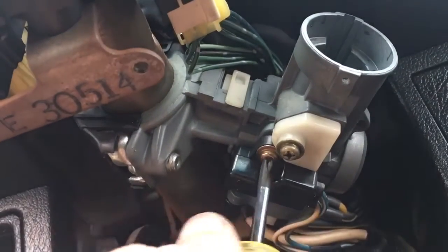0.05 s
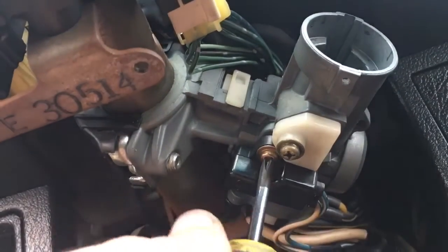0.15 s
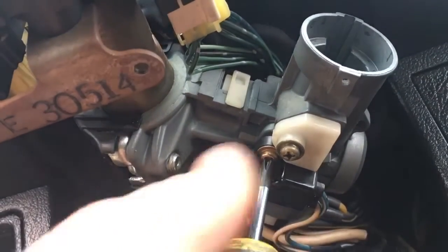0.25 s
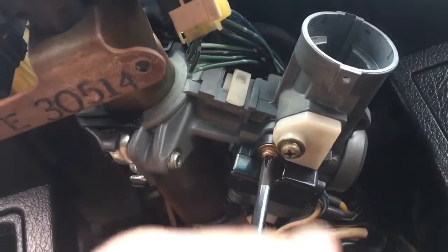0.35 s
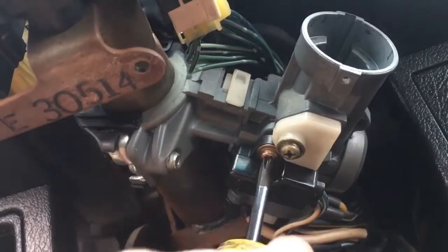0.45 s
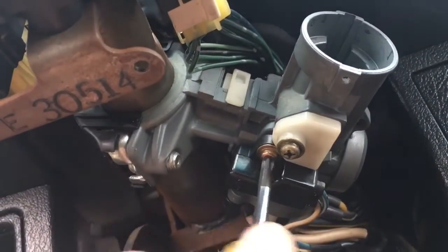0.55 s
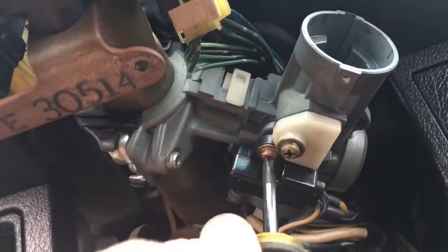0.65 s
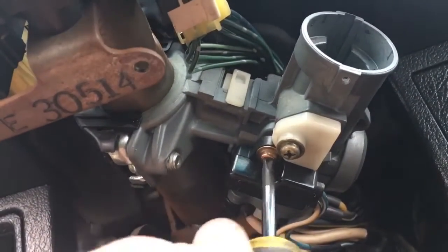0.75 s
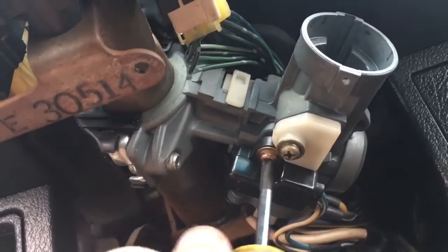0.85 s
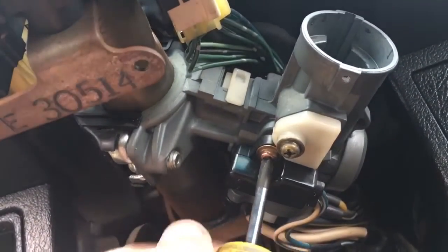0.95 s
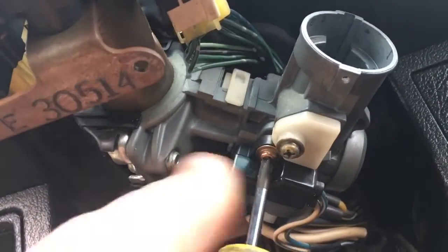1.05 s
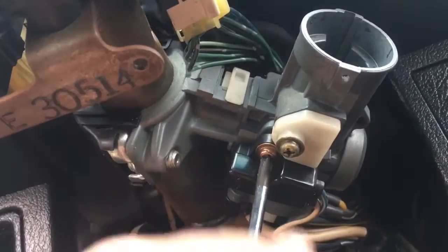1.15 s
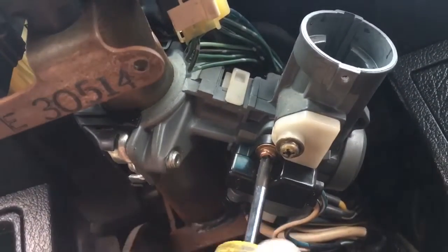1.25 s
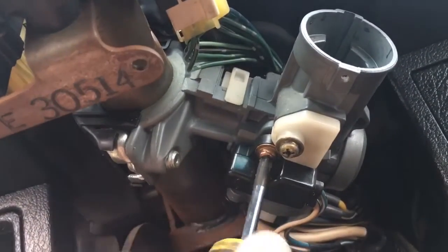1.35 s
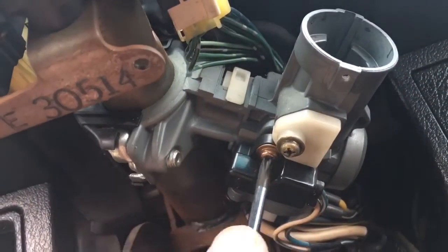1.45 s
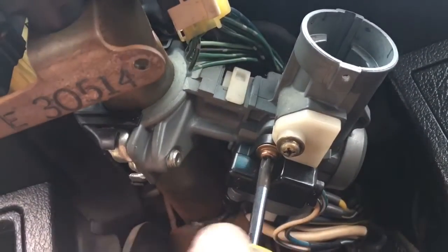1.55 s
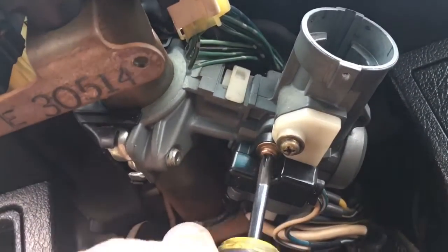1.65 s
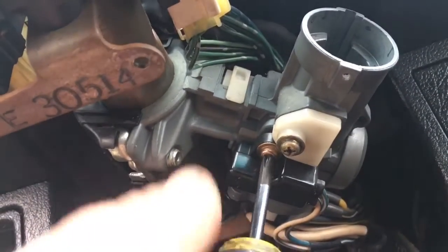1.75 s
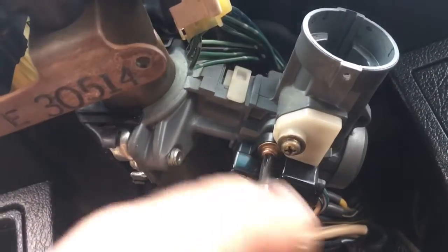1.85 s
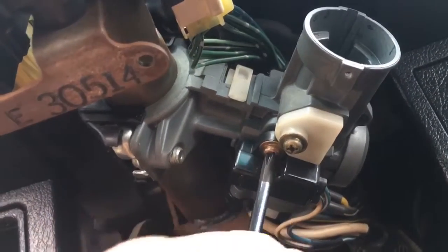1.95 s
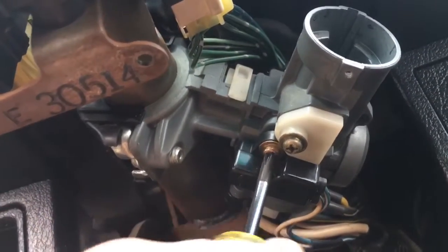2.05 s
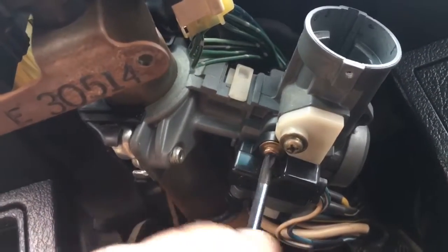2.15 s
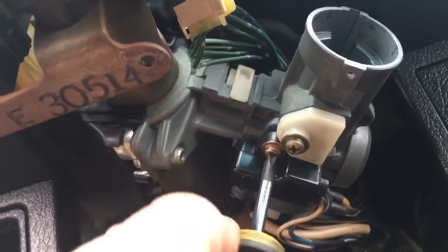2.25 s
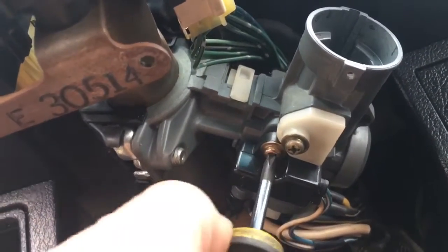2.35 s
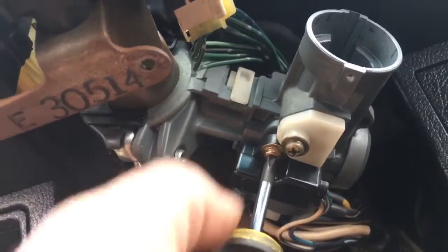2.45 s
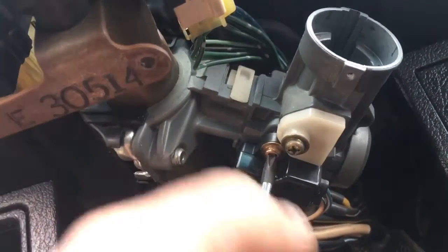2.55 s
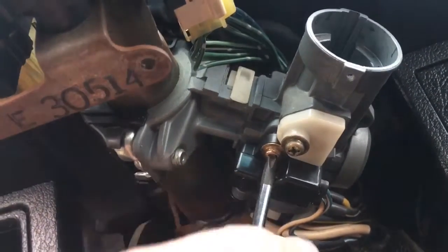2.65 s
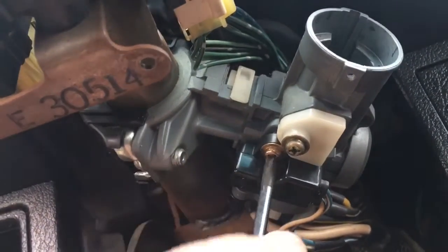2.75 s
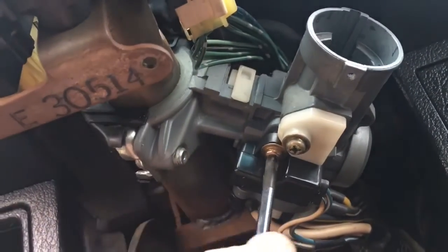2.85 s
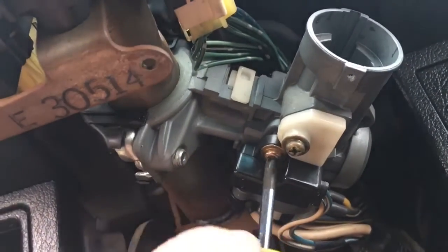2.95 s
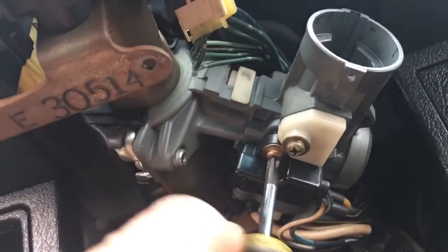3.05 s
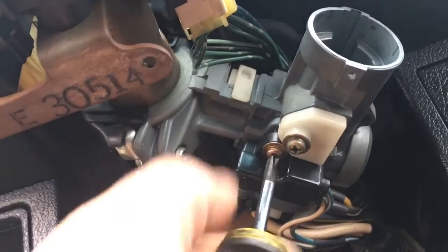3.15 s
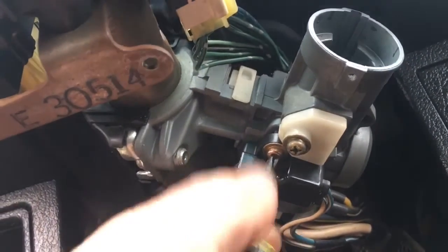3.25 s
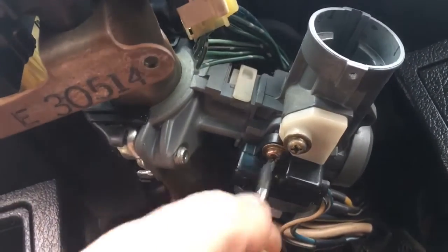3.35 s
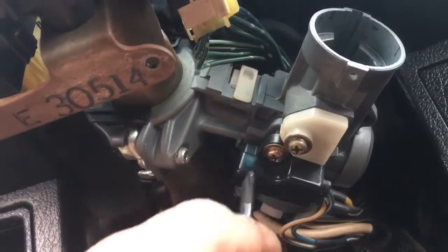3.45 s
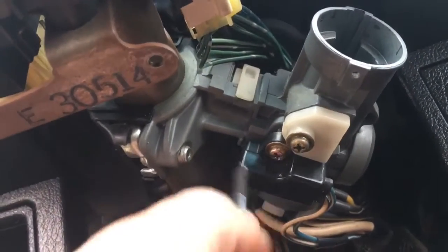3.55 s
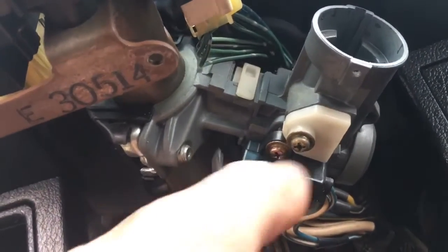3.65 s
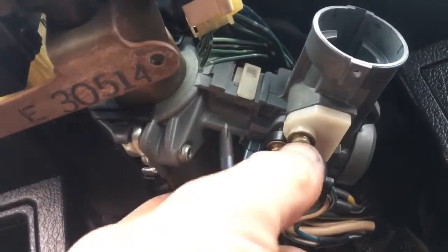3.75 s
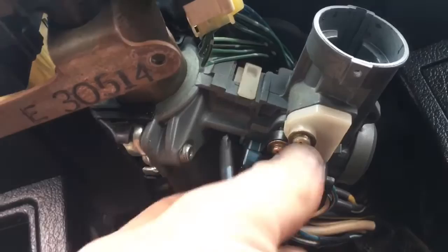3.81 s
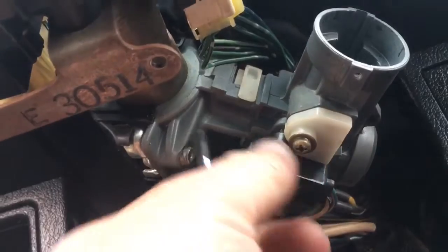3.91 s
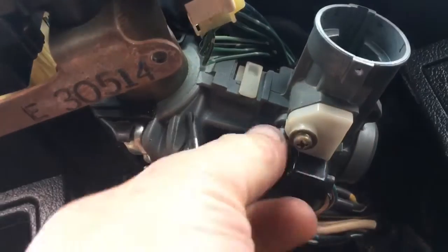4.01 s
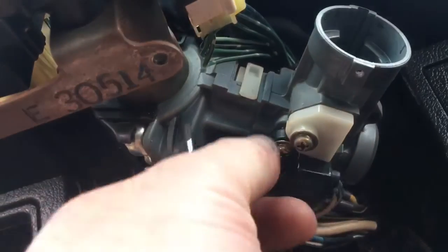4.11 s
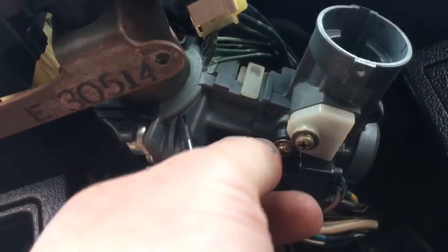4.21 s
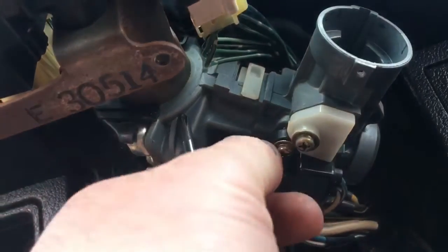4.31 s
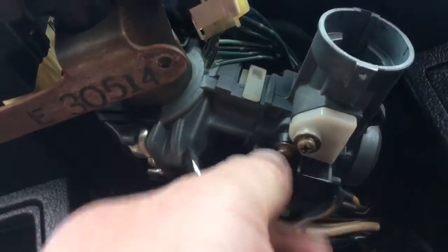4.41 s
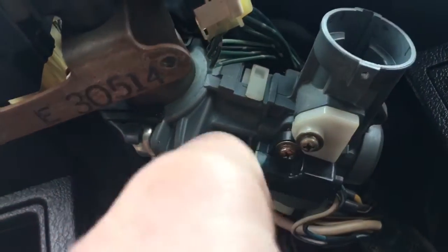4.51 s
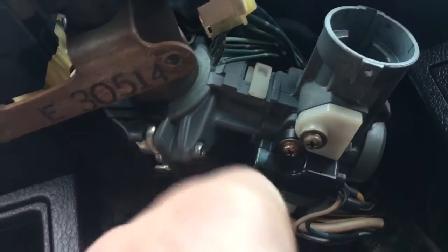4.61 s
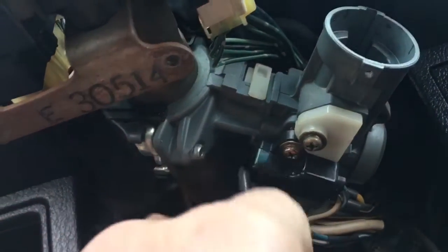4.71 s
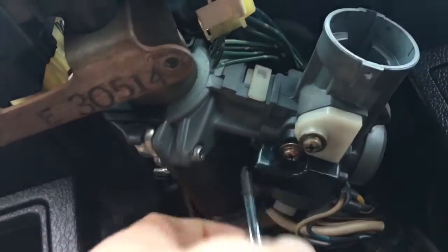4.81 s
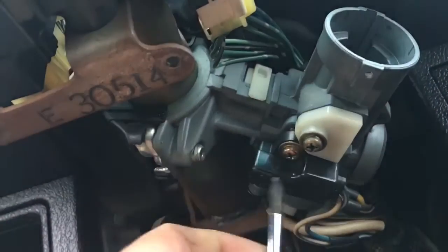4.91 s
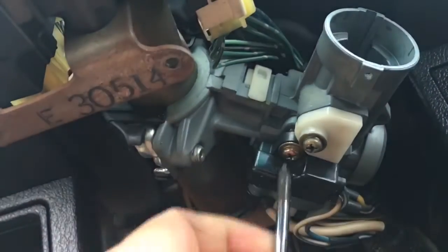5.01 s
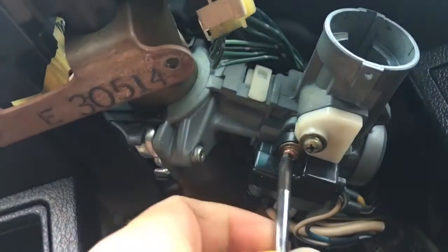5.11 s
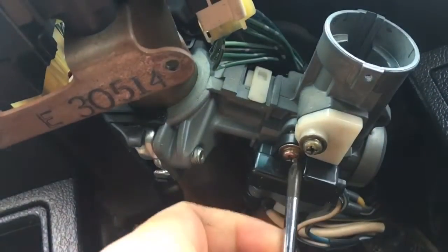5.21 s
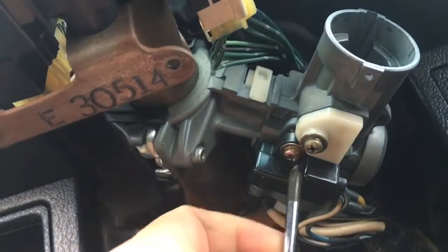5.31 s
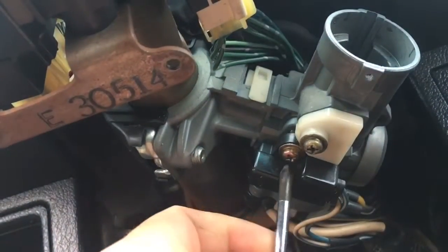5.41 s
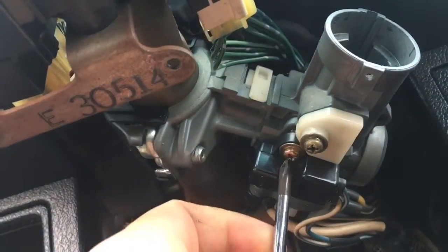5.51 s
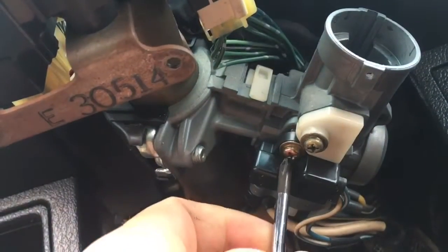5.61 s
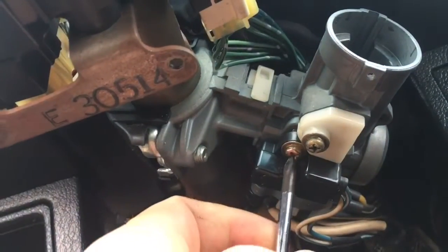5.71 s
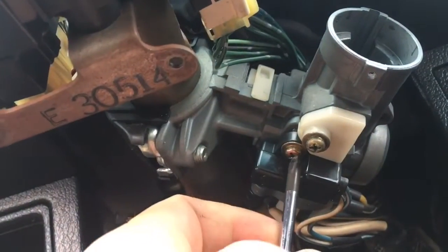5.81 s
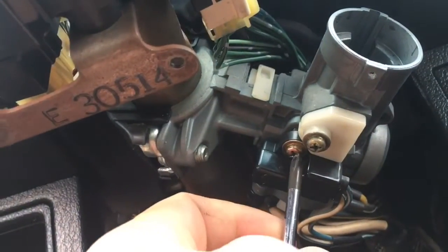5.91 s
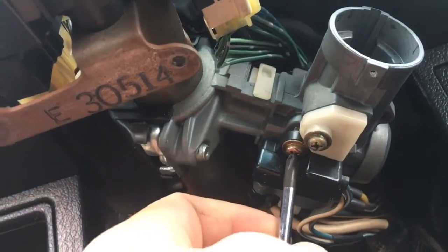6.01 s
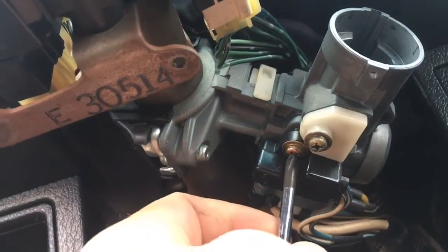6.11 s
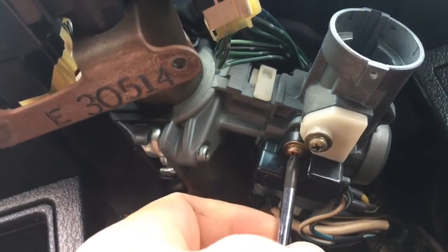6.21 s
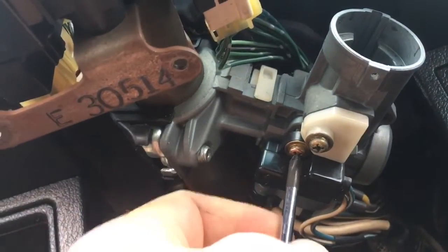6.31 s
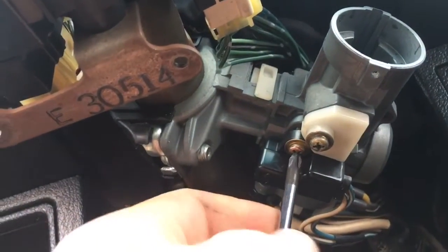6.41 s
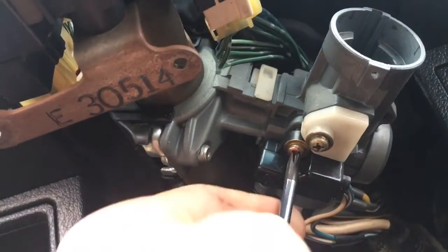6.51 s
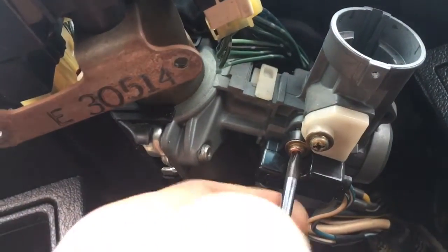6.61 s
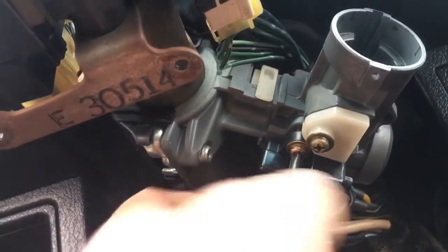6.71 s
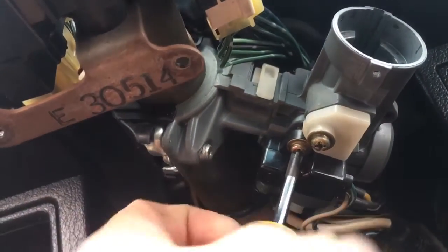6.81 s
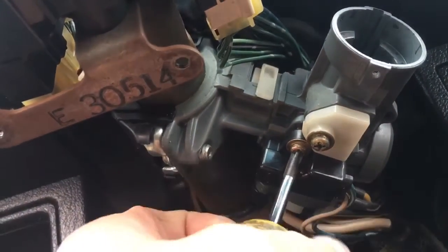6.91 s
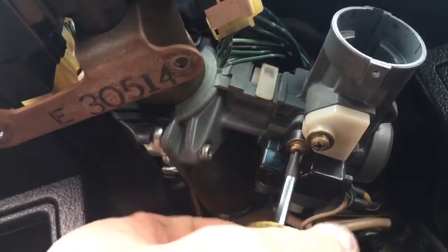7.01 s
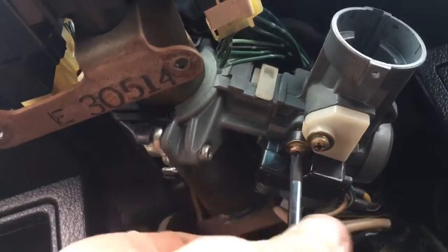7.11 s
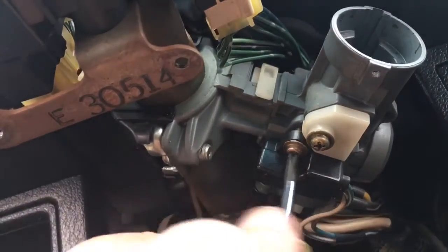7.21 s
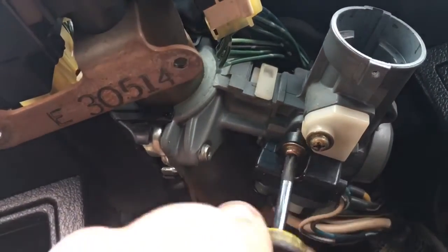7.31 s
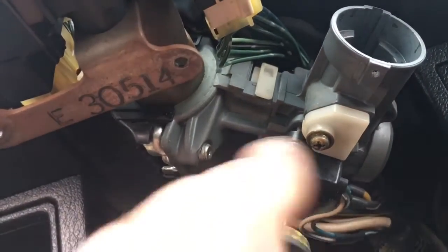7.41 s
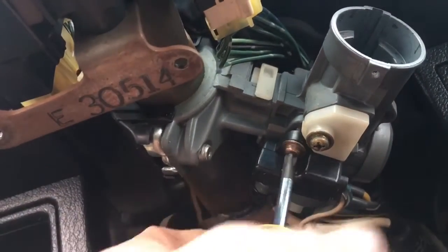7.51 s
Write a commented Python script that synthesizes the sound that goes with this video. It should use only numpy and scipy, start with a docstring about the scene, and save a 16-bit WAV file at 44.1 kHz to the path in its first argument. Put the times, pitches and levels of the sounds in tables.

```python
"""A screwdriver backs a small screw out of a metal housing under a car's dashboard, close to the microphone.
At first fingers rub the handle in long passes over a soft cabin rumble, with faint ticks and a grinding thread.
Soft hand bumps follow, then the loudest ticks and knocks near the middle, as impacts ring damped modes.
Later come quieter ticks, knocks and short scrapes of filtered friction noise, while a low throbbing hum grows."""
import sys
import numpy as np
from scipy import signal
from scipy.fft import rfft, irfft, next_fast_len
from scipy.io import wavfile
from scipy.ndimage import uniform_filter1d, map_coordinates

SR = 44100
rng = np.random.default_rng(int(sys.argv[2]) if len(sys.argv) > 2 else 0)


def generate_wav(sig):
    """Save sig (samples, or channels by samples) to the path in sys.argv[1] as 16-bit PCM at SR."""
    pcm = np.round(np.clip(np.atleast_2d(sig).T, -1, 1) * 32767).astype(np.int16)
    wavfile.write(sys.argv[1], SR, pcm)


N = 333396

# resonances of screwdriver and screw, before each blow's random shift: pitch_hz, level_db, t60_s
STEEL_MODES = [(2150, -33, .04), (2760, -19.5, 0.017), (2710, -18, 0.015), (3115, 2, 0.023),
               (3196, -2, 0.032), (3480, -5, 0.031), (3430, 0.5, 0.018), (3670, 17, 0.0056),
               (3970, 6.5, 0.018), (4160, 2, 0.016), (4520, -2, 0.027), (6470, -1, 0.017),
               (6450, -19, 0.026), (6840, -4, 0.029), (9050, -28, .012), (11600, -27, 0.034)]


def amp(db):
    """Decibel law: level to amplitude gain."""
    return 10 ** (np.asarray(db) / 20)


def unit(x):
    """Power normalization: scale to rms 1."""
    return x / np.sqrt(np.mean(x ** 2) + 1e-20)


def curve(rows):
    """Linear interpolation of (s, value) rows, one value per sample."""
    return np.interp(np.arange(N) / SR, *np.transpose(rows))


def wobble(rate):
    """Band-limited fluctuation: a spline through random knots, rate knots a second."""
    knots = rng.standard_normal(int(N * rate / SR) + 4)
    return map_coordinates(knots, [np.arange(N) * rate / SR])


def colour(x, points):
    """Linear filtering: x shaped by a (Hz, dB) spectrum, at rms 1."""
    size = next_fast_len(len(x) + 8192)
    hz, db = np.transpose(points)
    log_hz = np.log(np.fft.rfftfreq(size, 1 / SR) + 1)  # the 1 avoids log(0)
    gain = amp(np.interp(log_hz, np.log(hz), db))
    return unit(irfft(rfft(x, size) * gain, size)[:len(x)])


def noise(points, size=N):
    """Spectral shaping of white noise, at rms 1."""
    return colour(rng.standard_normal(size), points)


def patchy(x, depth_db):
    """Time-varying filtering: a smooth random gain over time and frequency shifts the colour."""
    bins = signal.stft(x, nperseg=512)[2]
    field = uniform_filter1d(rng.standard_normal(bins.shape), size=6, axis=0)  # across frequency
    field = uniform_filter1d(field, size=7, axis=1)  # across time
    return unit(signal.istft(bins * amp(depth_db * unit(field)), nperseg=512)[1][:N])


def add(track, s, sound):
    """Superposition: mix a sound in at s seconds."""
    part = track[max(round(s * SR), 0):][:len(sound)]
    part += sound[:len(part)]


def swell(size, rise):
    """Stroke envelope: power rises over the share rise of its length, then falls linearly."""
    peak = np.clip(rise, .02, .9)
    return np.sqrt(np.interp(np.linspace(0, 1, size), [0, peak, 1], [0, 1, 0]))


def swells(rows, rise):
    """Amplitude modulation: the gain of a series of strokes."""
    track = np.zeros(N)
    for s, length, db in rows:
        add(track, s, amp(db) * swell(int(length * SR), rise))
    return track


def grit(rate, grain_db):
    """Stick-slip friction: random micro-slips of uneven size, on average rate a second."""
    slips = rng.random(N) < rate / SR
    sizes = rng.standard_normal(N) * amp(grain_db * rng.standard_normal(N))
    return unit(slips * sizes)


def ring(modes, t):
    """Modal superposition: damped sines; the grip shifts their strength and pitch from blow to blow."""
    hz, db, t60 = np.transpose(modes)[:, :, None]
    size_db = 3.5 * rng.standard_normal((len(modes), 1))
    shift = .012 * rng.standard_normal((len(modes), 1))  # as a share of the pitch
    return np.sum(amp(db + size_db - 60 * t / t60) * np.sin(2 * np.pi * hz * (1 + shift) * t), axis=0)


def reflected(x, db, t60):
    """Diffuse reflection: nearby panels scatter a short dense tail back."""
    tail = rng.standard_normal(len(x)) * amp(-60 * np.arange(len(x)) / SR / t60)
    tail = tail / np.linalg.norm(tail)
    return x + amp(db) * signal.fftconvolve(x, tail)[:len(x)]


def favour(x, spot_hz, db):
    """Selective excitation: lift the band that a contact drives best."""
    band = signal.butter(2, [spot_hz / 1.22, spot_hz * 1.22], 'band', fs=SR, output='sos')
    return x + amp(db) * signal.sosfilt(band, x)


def cabin_rumble():
    """Broadband noise: a low cabin spectrum whose level drifts slowly."""
    # rumble spectrum: pitch_hz, relative_db
    spectrum = [(20, -31), (43, 2), (65, -3), (97, -5.5), (125, -4.5), (172, -15.5), (290, -22.5),
                (464, -38.5), (559, -35.5), (600, -34), (780, -63), (1320, -120)]
    # slow course of the rumble, ahead of a 7 dB lift: time_s, relative_db
    course = [(0, -56.5), (.4, -58.5), (1.3, -53.5), (3.2, -59.5), (3.7, -57), (5.4, -58.5), (7.56, -57)]
    return noise(spectrum) * amp(curve(course) + 7 + 0.99 * wobble(2.7))


def cabin_hiss():
    """Broadband noise: a faint hiss with a slowly shifting colour."""
    # hiss spectrum: pitch_hz, relative_db
    spectrum = [(240, -8.5), (400, -3), (650, -6), (840, -3), (1200, -5.5), (1520, -9), (2200, -3.5),
                (2800, -4.5), (4000, -8), (6500, -10), (10000, -14), (15800, -21)]
    # rms course of the hiss: time_s, level_db
    course = [(0, -61.5), (4.6, -61.5), (5.1, -64.5), (7.56, -61)]
    return patchy(noise(spectrum), depth_db=3.0) * amp(curve(course) + 0.28 * wobble(30))


def cabin_hum(hum_hz=73.3, waver_hz=0.82):
    """Amplitude and frequency modulation: a low tone wavers in pitch and throbs unevenly."""
    # course of the hum, ahead of a 3.5 dB lift: time_s, relative_db
    course = [(0, -67), (4.4, -58), (5.3, -49), (5.9, -53.5), (6.3, -48), (7.56, -47)]
    phase = 2 * np.pi * np.cumsum(hum_hz + waver_hz * wobble(4.1)) / SR
    throb = 1 + .36 * (wobble(28) + 1j * wobble(28))  # random in strength and phase
    return np.real(throb * np.exp(1j * phase)) * amp(curve(course) + 3.5)


def sliding(attack_s=0.014, fade_db=7, release_s=0.029):
    """Stick-slip friction: skin slides over the handle, each pass biting, losing pressure and letting go."""
    # fingers roll the handle, one pass each, level at its start before flutter: start_s, length_s, level_db
    passes = [(0, 0.49, -50.5), (0.474, 0.45, -51), (0.905, 0.46, -55), (1.399, 0.23, -53),
              (1.601, 0.284, -50.5), (1.863, .3, -58), (2.167, .17, -57.5), (2.707, .13, -58.5),
              (6.199, 0.14, -61)]
    # skin on the handle: pitch_hz, relative_db
    spectrum = [(290, -39), (500, -10), (728, -51), (878, -5), (972, -13), (1280, -4.5), (1520, -11),
                (2560, 2.5), (3220, 3), (4900, -5), (5580, 1), (6450, -4), (8990, -2), (11500, -6),
                (15800, -11.5)]
    pressure = np.zeros(N)
    for s, length, db in passes:
        t = np.arange(int(length * SR)) / SR
        contact = np.clip(np.minimum(t / attack_s, (length - t) / release_s), 0, 1)
        add(pressure, s, contact * amp(db - fade_db * t / length))
    skin = patchy(colour(grit(rate=3500, grain_db=2), spectrum), depth_db=3.3)
    flutter_db = 2.5 * wobble(90) + 2.5 * wobble(24.82)
    return skin * pressure * amp(flutter_db)


def bumps(rise_s=0.0044):
    """Heavily damped impact: flesh meets the handle in one or two dull swings."""
    # soft bumps of the hand, level of the push: start_s, level_db, pitch_hz
    pushes = [(2.605, -32.5, 152), (2.707, -36, 159), (2.735, -34.5, 169), (2.812, -29.5, 96),
              (2.866, -35, 140), (2.896, -36, 126), (3.799, -27.5, 141), (3.993, -35, 132)]
    track, t = np.zeros(N), np.arange(SR // 16) / SR
    push = (t / rise_s * np.exp(1 - t / rise_s)) ** 3  # greatest at rise_s
    for s, db, hz in pushes:
        add(track, s, amp(db) * push * np.sin(2 * np.pi * hz * t))
    return track


def scraping():
    """Friction noise: tip and fingers scrape in short strokes, each with its own brightness."""
    # strokes, treble tilt from 1 to 16 kHz: start_s, length_s, level_db, tilt_db_per_octave
    strokes = [(.004, 0.1, -52, -3.5), (0.179, 0.11, -51, 1), (2.466, 0.026, -50, 8.5),
               (2.915, 0.17, -58.5, 2), (3.153, 0.13, -60, 3.5), (3.41, 0.066, -54.5, 2),
               (3.72, 0.57, -62.5, 0.5), (4.137, 0.064, -47, -3.5), (4.441, 0.046, -46, -4),
               (4.917, 0.056, -42.5, -4.5), (5.886, 0.046, -55.5, -3), (5.963, .2, -60.5, -3.5),
               (6.45, .16, -56.5, -1), (6.635, 0.051, -53, -1), (6.684, .12, -48.5, -2.5),
               (6.877, 0.045, -46, -0.5), (6.965, 0.073, -45.5, -2.5), (7.054, 0.11, -53, -2),
               (7.24, 0.046, -49.5, -3), (7.288, 0.15, -62.5, -1), (7.4, .37, -58.5, 5.5)]
    # scraping friction before the tilt: pitch_hz, relative_db
    spectrum = [(260, -54), (450, -24), (653, -6), (866, -4.5), (1280, -2), (1370, -0.5), (1740, 1.5),
                (1880, 0.5), (2090, 3), (2610, 2.5), (3840, 6.5), (6370, 3.5), (8080, 0.5), (8970, 1),
                (15800, -9.5)]
    rub = patchy(colour(grit(rate=3500, grain_db=2.5), spectrum), depth_db=2)
    rub = rub * amp(2.3 * wobble(130))  # fast flutter in dB
    track = np.zeros(N)
    for s, length, db, tilt_db in strokes:
        piece = rub[round(s * SR):][:int(length * SR)]
        tilt = [(hz, tilt_db * np.log2(hz / 4000)) for hz in (1000, 16000)]
        stroke = colour(piece, tilt)
        add(track, s, amp(db) * stroke * swell(len(stroke), rise=0.15))
    return track


def spinning(spin_hz=5140, spin_q=6.7):
    """Resonance driven by friction: turned by fingertips, the loosened screw rasps in one high mode."""
    # spins: start_s, length_s, level_db
    turns = [(3.76, 0.51, -75), (4.14, 0.053, -48.5), (4.39, 0.074, -52.5), (4.445, 0.013, -42)]
    b, a = signal.iirpeak(spin_hz, spin_q, fs=SR)
    rasp = unit(signal.lfilter(b, a, grit(rate=4000, grain_db=4.5)))
    return rasp * swells(turns, rise=0.56)


def thread_grinding(soft_hz=6000):
    """Convolution of friction with a modal response: the thread grinds into the steel's lower modes."""
    # the thread grinds as it turns: start_s, length_s, level_db
    grinds = [(.19, 0.089, -49), (.49, 0.15, -55.5), (.625, 0.054, -46.5), (2.19, 0.088, -51.5),
              (3.402, 0.03, -51), (4.38, 0.12, -53.5), (4.87, 0.045, -50.5), (4.914, 0.065, -44),
              (6.035, 0.049, -48.5)]
    lowpass = signal.butter(2, soft_hz, fs=SR, output='sos')
    steel = signal.sosfilt(lowpass, ring(STEEL_MODES, np.arange(SR // 16) / SR))
    thread = unit(signal.fftconvolve(grit(rate=2600, grain_db=1.5), steel)[:N])
    return thread * swells(grinds, rise=0.6)


def shaft_squeaks(squeak_hz=2200, squeak_q=12):
    """Resonance driven by friction: light rubbing sings in one low mode of the shaft."""
    # faint squeaks: start_s, length_s, level_db
    squeaks = [(4.39, .03, -56), (4.53, 0.22, -63), (6.65, .046, -59.5), (6.97, .12, -61)]
    slips = grit(rate=1300, grain_db=2) * amp(4 * wobble(50))
    b, a = signal.iirpeak(squeak_hz, squeak_q, fs=SR)
    return unit(signal.lfilter(b, a, slips)) * swells(squeaks, rise=0.41)


def knocks(attack_s=0.0024, clack_db=-6, clack_t60=0.035):
    """Modal excitation: pushes on the screw ring the housing and its loose parts; soft ones only low modes."""
    # knocks through the housing, hardness as the upper band edge: start_s, peak_db, corner_hz
    pushes = [(1.918, -44, 410), (2.231, -35.5, 400), (2.282, -47, 1180), (3.031, -26, 1080),
              (3.082, -38, 2020), (3.334, -49, 2000), (3.516, -44, 500), (4.022, -43.5, 1560),
              (4.147, -32.5, 1970), (4.172, -41.5, 704), (4.459, -31.5, 373), (5.682, -45.5, 457),
              (5.754, -47, 1270), (5.899, -47, 1480), (6.056, -45, 1300), (6.200, -32.5, 470),
              (6.267, -47, 604), (6.473, -34, 990), (6.506, -37, 1127), (6.567, -29.5, 1010)]
    # the housing on its column, before each blow's random shift: pitch_hz, level_db, t60_s
    housing_modes = [(120, -9, 0.1), (255, 6, 0.054), (303, -4.5, 0.095), (383.6, -0.5, 0.056),
                     (574, -8, 0.045), (726, -8, 0.056), (807, -4, 0.051), (857, -2, 0.056),
                     (956, -12, 0.031), (1260, -17, 0.018), (1710, 1, 0.017), (1840, 17.5, 0.0057),
                     (2096, 18.5, 0.01)]
    clack_spectrum = [(100, 11.0), (900, -5.5), (2100, -4.5), (3000, -8), (8000, -32)]  # (Hz, dB)
    track, t = np.zeros(N), np.arange(SR // 8) / SR
    for s, db, corner_hz in pushes:
        body = ring(housing_modes, t)
        clack = noise(clack_spectrum, size=len(t)) / 2 * amp(clack_db - 60 * t / clack_t60)
        body = (body / np.abs(body).max() + clack) * (1 - np.exp(-t / attack_s))
        band = signal.butter(1, [corner_hz / 2, corner_hz], 'band', fs=SR, output='sos')
        knock = reflected(signal.sosfilt(band, body), db=-12, t60=0.14)
        add(track, s, amp(db) * knock / np.abs(knock).max())
    return track


def loose_ticks(per_s=7.1, scatter_db=3.5, contact_s=0.0024):
    """Random point process: faint contacts while the tip has play in the screw head."""
    # spells of play, peak before scatter: start_s, length_s, peak_db, brightness_db, favoured_hz
    spells = [(.6, 1.4, -47, 22, 8060), (5.151, 1.2, -53, -11, 4000)]
    rows = []
    for start, length, db, bright_db, spot_hz in spells:
        for when, size in rng.random((round(length * per_s), 2)):
            peak_db = db + scatter_db * (2 * size - 1)
            rows.append((start + when * length, peak_db, bright_db, contact_s, spot_hz))
    return rows


def ticks(crack_db=-5, crack_t60=0.016, chatter_db=-9, lowest_hz=2500, bite_share=0.28):
    """Impact excitation: the tip strikes and chatters on the screw, ringing its modes under a contact crack."""
    # strikes of the steel tip: start_s, peak_db, brightness_db, contact_s, favoured_hz
    strikes = [(0.215, -34.5, 2, .0023, 5870), (.569, -37, -18, 0.0031, 3200), (0.685, -40, 12, .001, 9000),
               (0.728, -36, 0, .0026, 5660), (0.769, -39, -7, 0.0024, 3380),
               (1.643, -38.5, 6, 0.0047, 3530), (1.688, -41, 16, 0.0032, 6040),
               (2.012, -39, 10, 0.0012, 9100), (2.116, -40, 14, 0.0024, 6000),
               (2.282, -36.5, -7, 0.0026, 3700), (3.0287, -27.5, 4.5, 0.0019, 3570),
               (3.034, -28.5, -14, 0.0032, 3720), (3.082, -31.5, -10, 0.00078, 3600),
               (3.087, -34, 2, 0.0014, 3600), (3.333, -31.5, 2.5, 0.0049, 3680),
               (3.339, -34.5, 8, .004, 3680), (3.357, -41, 9, .0011, 4000), (3.4045, -28, 9, 0.00068, 6960),
               (4.020, -38, 3, 0.0016, 5500), (4.1458, -21, 11, 0.0015, 5640),
               (4.349, -40, -2, 0.0011, 4170), (4.4577, -25, -2, 0.0018, 5000),
               (4.4612, -19, -2, 0.0035, 3270), (4.4873, -29, 1, 0.002, 3740),
               (4.7614, -11.5, -14, 0.00028, 3530), (4.811, -42, -2, 0.0061, 3400),
               (4.916, -31, -13, 0.00076, 3900), (4.9329, -12.5, 0, 0.0015, 3020),
               (4.942, -13, -0.5, .0031, 3150), (4.963, -24.5, -17, 0.00055, 3420),
               (4.971, -31, -2, .0015, 4060), (5.183, -41, -6, .0017, 3750), (5.32, -38, -4, .0013, 3500),
               (5.594, -36.5, -19, 0.0017, 4060), (5.7526, -36, -16, 0.0024, 4000),
               (5.775, -36, -8, 0.0015, 4030), (5.795, -37.5, 2, 0.0041, 3600),
               (5.895, -37, 2, 0.003, 3800), (6.0475, -31.5, -9, .003, 3900),
               (6.06, -29.5, 22, 0.0015, 14000), (6.111, -33.5, -5, 0.0012, 3780),
               (6.2864, -42.5, 3, 0.0012, 3600), (6.471, -38.5, 1, .0026, 3940),
               (6.505, -28.5, 22, .0007, 9150), (6.565, -21, 13, 0.0034, 4070),
               (7.186, -35, -3, 0.0023, 3530)]
    # crack of a bare contact: pitch_hz, relative_db
    crack_spectrum = [(150, -48), (500, -30), (1000, -14), (1750, -3.5), (2600, 1), (3600, -4), (5500, 5),
                      (8000, 0), (12000, -4.5), (16000, -16)]
    track, t = np.zeros(N), np.arange(SR // 14) / SR
    thin = signal.butter(4, lowest_hz, 'high', fs=SR, output='sos')  # so small a part radiates almost no bass
    for s, db, bright_db, length, spot_hz in strikes + loose_ticks():
        force = amp(chatter_db) * rng.standard_normal(len(t)) * np.exp(-(t / length) ** 4)
        force[0] = 1  # the first blow
        steel = signal.fftconvolve(force, ring(STEEL_MODES, t))[:len(t)]
        steel = signal.sosfilt(thin, steel)
        decay_db = -60 * np.maximum(t - length / 2, 0) / crack_t60
        crack = noise(crack_spectrum, size=len(t)) / 2 * amp(crack_db + bright_db + decay_db)
        crack = crack * (1 - np.exp(-t / (bite_share * length)))  # builds up within the contact
        tick = favour(steel / np.abs(steel).max() + crack, spot_hz, db=-1.5)
        tick = reflected(tick, db=-6.5, t60=0.037)
        crest = np.sqrt(2 * uniform_filter1d(tick ** 2, size=30).max())  # peak of an equally strong sine
        add(track, s, amp(db) * tick / crest)
    return track


def scene():
    """Superposition: all sources add at one close microphone."""
    background = cabin_rumble() + cabin_hiss() + cabin_hum()
    hand = sliding() + bumps()
    rubbing = scraping() + spinning() + thread_grinding() + shaft_squeaks()
    impacts = knocks() + ticks()
    return (background + hand + rubbing + impacts)[None]


def record(dry, top_hz=15950):
    """Linear filtering: the microphone port colours the sound, and nothing is kept from top_hz up."""
    # response of the microphone port: pitch_hz, gain_db
    port = [(20, 1), (1900, -1), (2650, -5), (3150, -2), (4300, 0), (5100, -3.5), (5750, 0.5), (6500, -2),
            (7100, -1), (7900, -3), (9200, -1), (10300, -5), (11700, -1.5), (15800, -5)]
    size = next_fast_len(N + 8192)
    hz = np.fft.rfftfreq(size, 1 / SR)
    gain = amp(np.interp(hz, *np.transpose(port))) * (hz < top_hz)
    return irfft(rfft(dry, size) * gain, size)[:, :N]


dry = scene()
out = record(dry)
generate_wav(out)
```